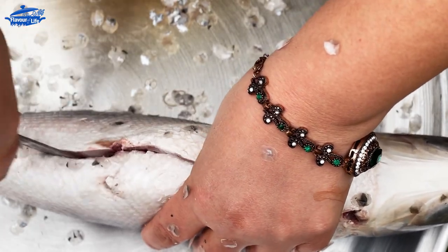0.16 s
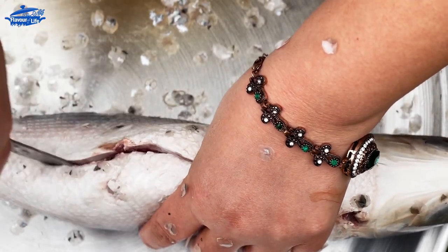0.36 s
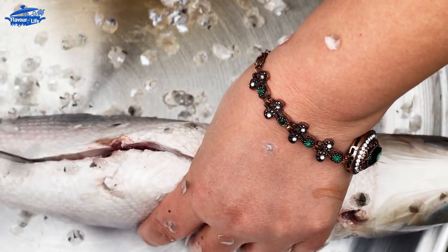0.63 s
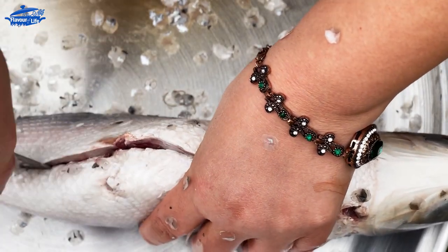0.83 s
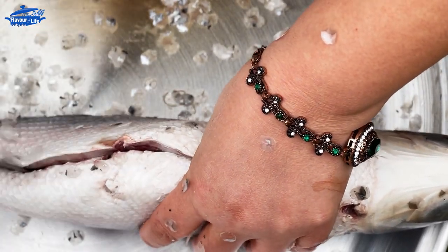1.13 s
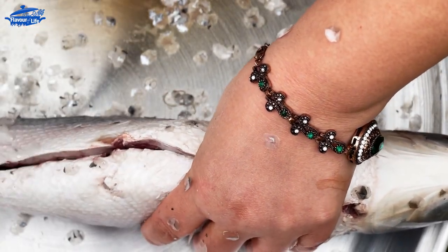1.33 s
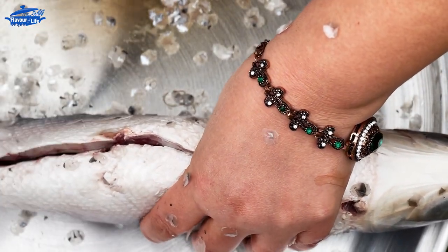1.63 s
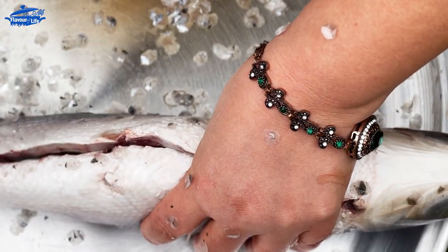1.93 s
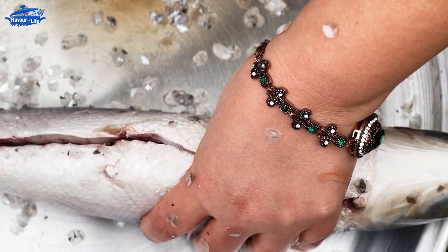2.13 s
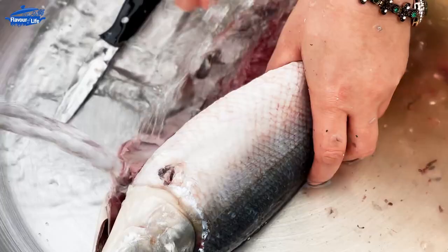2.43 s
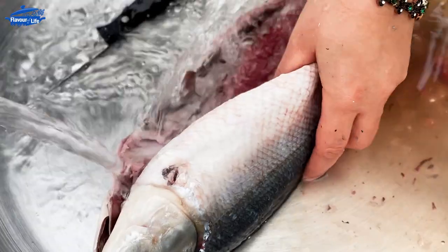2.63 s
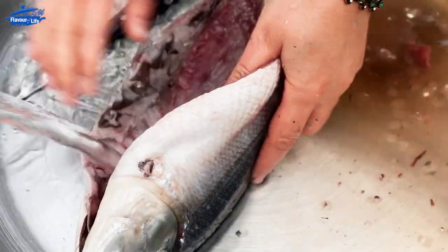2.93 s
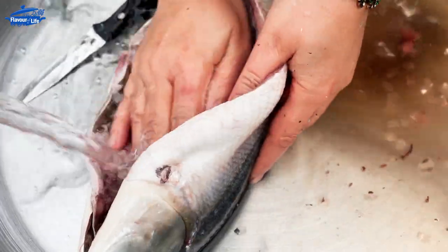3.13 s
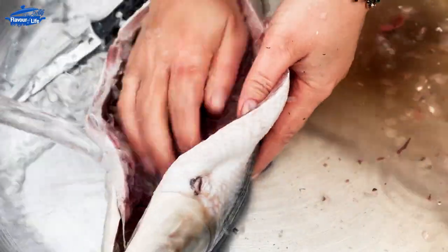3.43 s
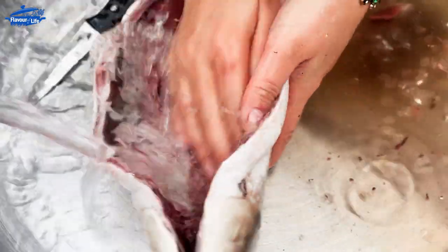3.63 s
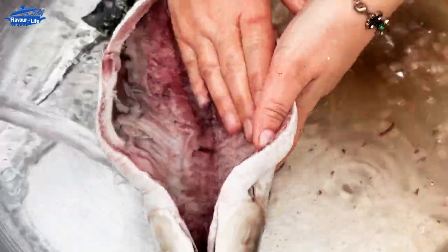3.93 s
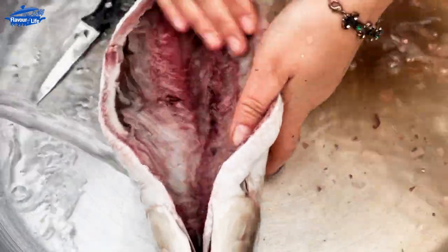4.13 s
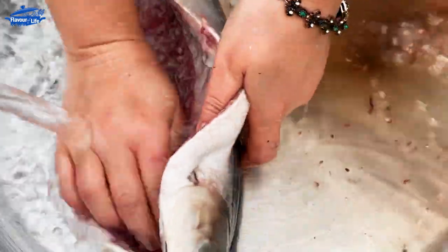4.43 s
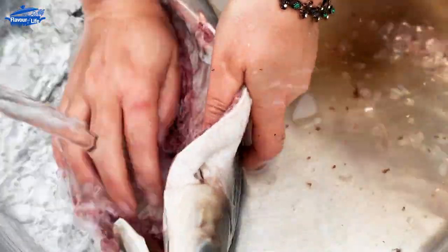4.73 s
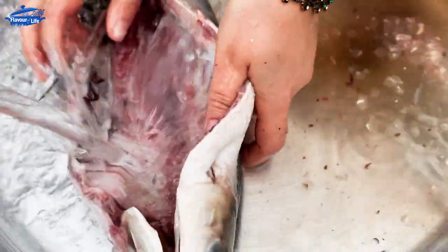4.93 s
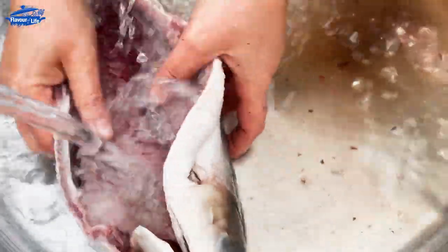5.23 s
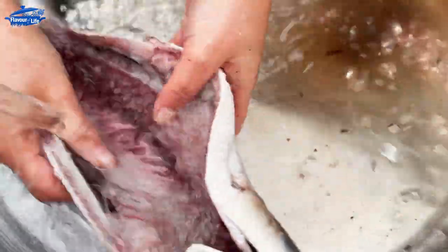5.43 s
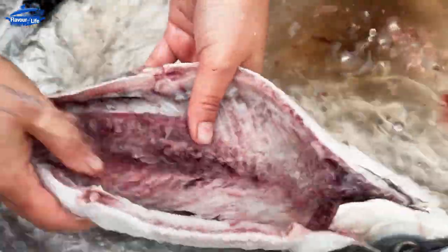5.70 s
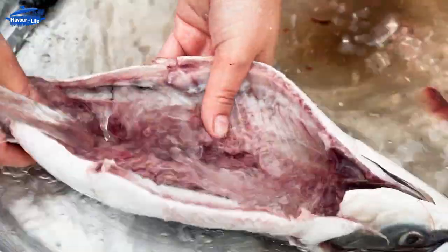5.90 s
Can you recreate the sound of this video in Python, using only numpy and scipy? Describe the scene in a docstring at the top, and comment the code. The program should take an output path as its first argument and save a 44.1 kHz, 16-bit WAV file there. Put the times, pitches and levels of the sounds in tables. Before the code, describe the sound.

Recorded very close, in a quiet kitchen with only a faint dull reverberation and soft air noise. From 0 to 2.4 s a knife slits a fish: low-level wet rubbing in uneven pushes, bunches of fine crackling fibres, and thin squeaks around 2.5-4.5 kHz, some gliding upward. A short crunchy bone snap comes at 1.54 s and a louder one at 1.9 s, each with a small fleshy thud. At about 2.47 s the cutting ends abruptly and a water stream begins, with small rising bubbles, fine spray and droplet clicks. Hand sweeps make it surge, strongly around 3.3, 4.0 and 4.3 s, with round plops and squirts; a prominent plop pops at 4.8 s. From 5.3 s the fish slides, slapping wetly on damped steel at 5.43 s. A strong squelch follows near 5.7 s, with bubbling water to the end at about 6 s.

```python
"""Gutting and rinsing a fish.

A knife slits the belly in a steel basin: torn fibres crackle, gliding tones squeak, two bones snap.
At TAP_ON_S the cutting noise stops and a tap runs: random chirped bubbles and droplet clicks,
stirred by a hand. The fish also slides and, near the end, slaps down: click bursts drive basin modes.
"""
import sys
import numpy as np
from scipy import signal
from scipy.fft import rfft, irfft, next_fast_len
from scipy.io import wavfile

SR = 44100
rng = np.random.default_rng(int(sys.argv[2]) if len(sys.argv) > 2 else 0)


def put_to_file(sound):
    """Save the sound as 16-bit audio at rate SR, in the file named by the first command-line argument."""
    columns = np.atleast_2d(sound).T  # one column per channel
    safe = np.clip(columns, -1, 1)
    whole_steps = np.round(safe * 32767)
    wavfile.write(sys.argv[1], SR, whole_steps.astype(np.int16))


N = 267246
TIME = np.arange(N) / SR
TAP_ON_S = 2.467
# spectrum of spray and wet ticks: f/Hz, level/dB
SPRAY_SPECTRUM = [(300, -20), (700, -9), (1500, 1), (3300, 7), (5000, -2), (7000, -1), (10000, -1),
                  (13500, -4), (16000, -7.5)]


def from_db(db):
    """Decibels to amplitude gain."""
    return 10 ** (np.asarray(db) / 20)


def rms_one(x):
    """Scale to unit rms."""
    return x / np.sqrt(np.mean(x ** 2) + 1e-20)


def add(out, start_s, sound):
    """Mix a short sound into out at start_s."""
    at = int(np.clip(start_s * SR, 0, N - 1))
    out[at:at + len(sound)] += sound[:N - at]


def colour(x, spectrum):
    """Causal minimum-phase filter with the given spectrum, by folded cepstrum; unit rms out."""
    size = 2 * next_fast_len(len(x) // 2 + 2048)
    hz, db = np.transpose(spectrum)
    log_hz = np.log(np.arange(size // 2 + 1) * SR / size + 1)
    log_gain = np.log(from_db(np.interp(log_hz, np.log(hz), db)))
    cepstrum = irfft(log_gain)
    cepstrum[1:size // 2] *= 2
    cepstrum[size // 2 + 1:] = 0
    response = np.exp(rfft(cepstrum))
    return rms_one(irfft(rfft(x, size) * response)[:len(x)])


def cut(x, hz, kind, order=2):
    """Butterworth high- or low-pass."""
    sos = signal.butter(order, min(hz, .45 * SR), kind, fs=SR, output="sos")
    return signal.sosfilt(sos, x)


def ring(force, modes):
    """Damped sine modes (f/Hz, level/dB, t60/s) driven by a force, with alternating signs."""
    out = 0
    for k, (hz, db, t60_s) in enumerate(modes):
        radius = from_db(-60 / (t60_s * SR))
        angle = 2 * np.pi * hz / SR
        poles = [1, -2 * radius * np.cos(angle), radius * radius]
        mode = signal.lfilter([0, np.sin(angle)], poles, force + 1e-18)
        out = out + (-1) ** k * from_db(db) * mode
    return out


def grains(size, per_s, spread_db):
    """Random single-sample clicks of uneven strength and either sign."""
    clicks = np.zeros(size)
    at = np.flatnonzero(rng.random(size) < per_s / SR)
    strength_db = spread_db * np.minimum(rng.exponential(1, len(at)), 4)
    clicks[at] = rng.choice([-1, 1], len(at)) * from_db(strength_db)
    return clicks


def clumps(rate_hz, depth_db):
    """A gain that swells and sinks at random, below rate_hz and within +-depth_db."""
    drift = rms_one(cut(rng.standard_normal(N), rate_hz, "low"))
    return from_db(depth_db * np.tanh(drift))


def swell(peak_s, db, attack_s, release_s, hold_s=0):
    """Power of one gesture: rises to its level, holds, sinks; attack and release span 20 dB."""
    before = np.maximum(peak_s - TIME, 0) / attack_s
    after = np.maximum(TIME - peak_s - hold_s, 0) / release_s
    return from_db(db - 20 * np.minimum(before + after, 10)) ** 2


def bubble(hz, cycles, rise):
    """A bubble swells within a cycle or two, then rings down, its pitch rising as it nears the surface."""
    # age runs 0..1 while the ring falls 60 dB
    age = np.arange(int(cycles / hz * SR) + 2) * hz / SR / cycles
    onset = 1 - np.exp(-(age * cycles) ** 2)
    tone = np.sin(2 * np.pi * cycles * age * (1 + rise * age / 2))
    return tone * from_db(-60 * age) * onset


def slitting():
    """The blade rubs along wet flesh while fine fibres part in bunches: two streams of clicks."""
    # blade pushes: hardest at t/s, rubbing level/dB, build/s, release/s (per 20 dB)
    push_table = [(0.03, -65.5, 0.055, .3), (.19, -72, .1, 0.41), (0.422, -64, .07, 0.11),
                  (1.15, -65.5, 0.12, 0.31), (1.52, -57.5, 0.19, 0.061), (1.661, -65, 0.18, 0.22),
                  (1.89, -59.5, 0.067, 0.032), (1.99, -64.5, .12, 0.39), (2.44, -69.5, 0.57, .1)]
    # bunches of tearing fibres: start t/s, length/s, crackle level/dB before high-pass
    tear_table = [(0.01, 0.047, -66.5), (0.185, 0.048, -65.5), (0.365, 0.036, -68), (0.414, 0.017, -55),
                  (0.547, 0.097, -68), (.73, 0.056, -72), (.8, 0.043, -63), (.975, 0.041, -69),
                  (1.108, .09, -64), (1.293, 0.084, -62.5), (1.39, 0.16, -70), (1.665, 0.11, -71.5),
                  (1.838, .05, -67.5), (1.981, 0.079, -69), (2.267, 0.044, -69.5), (2.34, 0.11, -69)]
    # click spectra: f/Hz, level/dB
    rub_spectrum = [(150, -13.5), (320, -1), (700, -10.5), (1400, -1), (2100, -4.5), (2700, 3.5),
                    (3800, -1), (5500, -13), (9000, -32.5)]
    crackle_spectrum = [(1500, -12.5), (3500, 3), (6000, 1), (9000, 3), (13000, 0), (16000, -1.5)]
    resting_blade_db, stray_fibres_db = -91, -79
    tear_attack_s, tear_release_s = 0.018, 0.019

    pushing = from_db(resting_blade_db) ** 2
    pushing = pushing + sum(swell(*push) for push in push_table)
    tearing = from_db(stray_fibres_db) ** 2
    for start_s, length_s, db in tear_table:
        tearing = tearing + swell(start_s, db, tear_attack_s, tear_release_s, length_s)
    rub = np.sqrt(pushing) * colour(grains(N, 12000, 2.3), rub_spectrum)
    fibres = grains(N, 2400, 3.7) * clumps(45, 7.7)
    crackle = np.sqrt(tearing) * colour(fibres, crackle_spectrum)
    return (rub + cut(crackle, 1500, "high")) * (TIME < TAP_ON_S)


def squeaks(flutter_hz=90, waver=.005, fray_hz=300, fray_db=-10, gain_db=-1):
    """The sliding blade squeaks: narrow tones that swell and glide, frayed by the uneven grip."""
    # start t/s, end t/s, start f/Hz, end f/Hz, rms level/dB before gain_db
    squeak_table = [(0.111, 0.185, 3050, 2590, -76), (.23, 0.326, 2700, 2710, -70),
                    (0.629, 0.762, 2580, 2720, -68), (.7, 1.005, 3480, 3500, -79),
                    (0.754, 0.996, 2730, 2700, -82), (0.67, 0.688, 1519, 1530, -72),
                    (0.86, 1.052, 3870, 3820, -83), (0.856, 1.11, 3020, 3050, -75),
                    (0.986, 1.142, 2670, 2610, -68.5), (1.366, 1.539, 2450, 2730, -68),
                    (1.627, 1.89, 2850, 4590, -71.5), (1.655, 1.716, 3150, 2720, -66),
                    (1.711, 1.852, 2360, 2410, -71), (1.788, 1.894, 780, 770, -71.5),
                    (2.042, 2.154, 2620, 2686, -68), (2.046, 2.174, 2930, 3260, -73),
                    (2.202, 2.45, 3070, 4490, -73)]
    out = np.zeros(N)
    for start_s, end_s, from_hz, to_hz, db in squeak_table:
        size = max(int((end_s - start_s) * SR), 256)
        pitch_drift = rms_one(cut(rng.standard_normal(size), flutter_hz, "low"))
        grip = rms_one(cut(rng.standard_normal(size), flutter_hz, "low"))
        fray = from_db(fray_db) * rms_one(cut(rng.standard_normal(size), fray_hz, "low"))
        hz = np.linspace(from_hz, to_hz, size) * (1 + waver * pitch_drift)
        tone = np.sin(2 * np.pi * np.cumsum(hz) / SR) * (1 + 0.34 * grip + fray)
        tone = rms_one(tone * signal.windows.tukey(size, .5))
        add(out, start_s, from_db(db + gain_db) * tone)
    return out


def snaps(tail_t60_s=0.019, bone_t60_s=0.01265, bone_db=-1, push_hz=900, boom_hz=130, boom_db=-28):
    """A bone splinters ever harder for a few milliseconds, then gives way and jolts the body."""
    # t/s, crunch peak/dB, crunch length/s (full at half of it), bone f/Hz,
    # thud peak/dB (without boom), thud delay/s, body pitch factor
    snap_table = [(1.5375, -16, 0.00724, 2800, -17, 0.00295, 1.01),
                  (1.8991, -8.5, 0.0073, 3300, -10.5, .0045, 1.128)]
    # splinter spectrum: f/Hz, level/dB
    snap_spectrum = [(50, -38), (200, -22), (350, -6), (700, -4.5), (1050, -10), (1400, 1), (2000, -7),
                     (3000, -0.5), (4200, 3.5), (4900, 2), (6200, -13), (7200, -3), (8500, -11.5),
                     (11000, -9), (16000, -22)]
    # body modes of the fish: f/Hz before pitch factor, level/dB, t60/s
    flesh_modes = [(372, 0.5, 0.024), (530, -1, .013), (780, -5, .014), (1206, -7, 0.015)]
    out, t = np.zeros(N), TIME[:SR // 10]
    for snap_s, crunch_db, length_s, bone_hz, thud_db, delay_s, pitch in snap_table:
        build = np.minimum(t / length_s * 2, 1) ** 2
        decay = from_db(-60 * np.maximum(t - length_s / 2, 0) / tail_t60_s)
        splinters = colour(grains(len(t), 20000, 0.9) * build * decay, snap_spectrum)
        bone = rms_one(ring(splinters, [(bone_hz, 0, bone_t60_s)]))
        crunch = splinters + from_db(bone_db) * bone
        add(out, snap_s, from_db(crunch_db) * crunch / np.abs(crunch).max())

        release = cut(1. * (t == 0), push_hz, "low", order=1)
        thud = cut(ring(release, np.multiply(flesh_modes, [pitch, 1, 1])), 300, "high")
        boom = cut(release, boom_hz, "low")   # the whole fish is jolted
        jolt = thud / np.abs(thud).max() + from_db(boom_db) * boom / boom.max()
        add(out, snap_s + delay_s, from_db(thud_db) * jolt)
    return out


def ticks(t60_s=0.017, ring_t60_s=.01, ring_db=-3, low_hz=900, gain_db=1):
    """Flesh, fingers and drops tick: one sharp rupture, a quick run of smaller ones, a short ring."""
    # t/s, peak level/dB before gain_db, ring f/Hz
    tick_table = [(0.0417, -44, 3700), (0.1837, -46.5, 2834), (0.417, -43.5, 3620), (0.5207, -51, 2700),
                  (0.73, -55, 3520), (1.0727, -50.5, 2700), (1.1369, -43.5, 1250), (1.6077, -43.5, 2870),
                  (1.6765, -38.5, 7090), (2.1245, -48, 3080), (3.1972, -29.5, 3540), (3.3405, -28, 3150),
                  (3.755, -28.5, 3000), (3.765, -31, 2700), (4.2655, -27.5, 1510), (4.384, -28, 3640),
                  (4.78, -33, 5170), (5.3936, -24, 3180), (5.5396, -26.5, 3700), (5.598, -33, 3020),
                  (5.7134, -28, 2900)]
    out, t = np.zeros(N), TIME[:SR // 20]
    for start_s, db, hz in tick_table:
        force = grains(len(t), 9000, 1.5) * from_db(-60 * t / t60_s) + 2.3 * (t == 0)
        ringing = rms_one(ring(force, [(hz, 0, ring_t60_s)]))
        tick = colour(force, SPRAY_SPECTRUM) + from_db(ring_db) * ringing
        tick = cut(tick, low_hz, "high", order=3)
        add(out, start_s, from_db(db + gain_db) * tick / np.abs(tick).max())
    return out


def churning():
    """Power-sums stream, hand sweeps and squelches: bubbling/dB, spray/dB, lowest bubble f/Hz."""
    # hand sweeps trap air: middle t/s, 1/e power width/s, bubbling/dB, spray/dB, lowest f/Hz
    sweep_table = [(2.592, 0.38, -52, -58.5, 1130), (2.835, 0.077, -52.5, -54, 1100),
                   (3.078, 0.23, -53.5, -62, 1397), (3.35, .12, -52.5, -52.5, 910),
                   (3.48, 0.16, -53.5, -58.5, 930), (3.963, .38, -50.5, -53.5, 1000),
                   (4.27, .13, -46.5, -49.5, 1000), (4.498, 0.13, -58.5, -55, 850),
                   (4.843, 0.25, -53.5, -57, 1190), (5.1, 0.28, -54.5, -56, 1560),
                   (5.37, 0.23, -49, -48.5, 950), (5.662, .2, -50.5, -51, 1200),
                   (5.922, .2, -53, -59, 1830)]
    # water squirts from under the fingers: t/s, bubbling/dB, spray/dB
    squelch_table = [(3.195, -52, -52), (3.608, -44.5, -51), (3.765, -51.5, -41), (4.386, -47, -43.5),
                     (4.794, -47, -40), (5.716, -37.5, -38.5), (5.848, -43, -69)]
    squelch_attack_s, squelch_release_s, squelch_lowest_hz = 0.024, 0.047, 1000

    # power shape, bubbling/dB, spray/dB, lowest f/Hz; the steady stream comes first
    gestures = [(np.ones(N), -59.5, -57.5, 1250)]
    for middle_s, width_s, *settings in sweep_table:
        gestures.append((np.exp(-(2 * (TIME - middle_s) / width_s) ** 2), *settings))
    for peak_s, *levels_db in squelch_table:
        shape = swell(peak_s, 0, squelch_attack_s, squelch_release_s)
        gestures.append((shape, *levels_db, squelch_lowest_hz))

    bubbling = spray = weighted_hz = 0
    for shape, bubbling_db, spray_db, hz in gestures:
        power = shape * from_db(bubbling_db) ** 2
        bubbling = bubbling + power
        weighted_hz = weighted_hz + power * hz   # the strongest gesture dominates bubble size
        spray = spray + shape * from_db(spray_db) ** 2
    return 10 * np.log10(bubbling), 10 * np.log10(spray), weighted_hz / bubbling


def fizz(count=20, cycles=30, click_db=-4):
    """Droplets tick on the wet surfaces, and the tiniest bubbles ping for an instant."""
    pings = 0
    for hz in np.geomspace(4000, 15500, count):
        pings = pings + ring(grains(N, 120, 4.14), [(hz, 0, cycles / hz)])
    return rms_one(pings) + from_db(click_db) * rms_one(grains(N, 8000, 3.2))


def rinsing(count=7500, top_hz=6000, cycles=24, rise=0.21, size_spread_db=4.0):
    """The stream beats air into swarms of small bubbles and throws a fine spray."""
    # swarm spectrum: f/Hz, level/dB
    water_spectrum = [(500, -36), (720, -34.5), (900, 1), (1600, -2), (2200, 1), (3200, 5), (4200, -9.5),
                      (7000, -11.5), (12000, -48)]
    gurgle_hz, gurgle_db = 16.6, 2   # bubbles come in bunches
    bubbling_db, spray_db, lowest_hz = churning()
    swarm = np.zeros(N)
    for when, smallness, strength, damping, side in rng.random((count, 5)):
        start_s = TAP_ON_S + when * (TIME[-1] - TAP_ON_S)
        low_hz = lowest_hz[int(start_s * SR)]
        hz = low_hz * (top_hz / low_hz) ** smallness
        strength_db = size_spread_db * min(-np.log(1 - strength), 4)
        gain = from_db(strength_db) * np.sqrt(hz / top_hz) * np.sign(side - .5)
        add(swarm, start_s, gain * bubble(hz, cycles * (.5 + damping), rise))
    swarm = from_db(bubbling_db) * colour(swarm * clumps(gurgle_hz, gurgle_db), water_spectrum)
    spray = from_db(spray_db) * colour(fizz() * clumps(34, 2.58), SPRAY_SPECTRUM)
    return (swarm + cut(spray, 780, "high", order=1)) * (TIME >= TAP_ON_S)


def plops(cycles=30, rise=.5, pitch=0.938, gain_db=1.0, low_hz=780):
    """Large air pockets squeezed out under the hand ring as single bubbles."""
    # t/s, level/dB before gain_db and high-pass, f/Hz before the pitch factor
    plop_table = [(3.33, -33.5, 967), (3.482, -36.5, 1030), (3.609, -33.5, 1630), (3.919, -32, 1110),
                  (3.984, -30.5, 1670), (4.044, -37.5, 1090), (4.095, -31, 1473), (4.226, -35.5, 1050),
                  (4.266, -26.5, 1584), (4.306, -28.5, 2125), (4.354, -31.5, 2250), (4.361, -34.5, 1060),
                  (4.792, -22, 1740), (4.855, -28.5, 1356), (5.065, -30.5, 1900), (5.152, -35.5, 1192),
                  (5.195, -30.5, 2280), (5.726, -30.5, 1057), (5.841, -30.5, 1070)]
    out = np.zeros(N)
    for start_s, db, hz in plop_table:
        add(out, start_s, from_db(db + gain_db) * bubble(hz * pitch, cycles, rise))
    return cut(out, low_hz, "high", order=5)


def fish_on_basin(steel_db=-3, wet_db=-2):
    """Wet skin meets the steel patch by patch; the blows and the sliding drive the basin's modes."""
    # landings: t/s, force level/dB, contact/s, decay t60/s, low-pass f/Hz
    slap_table = [(5.309, -33, 0.011, 0.03, 800), (5.434, -15, 0.014, 0.069, 6700),
                  (5.597, -41.5, 0.0071, 0.086, 2060), (5.708, -45, 0.017, 0.041, 6040),
                  (5.84, -44, 0.021, 0.07, 1200)]
    # shoves over the steel: fastest at t/s, force level/dB, stopping time/s (per 20 dB)
    shove_table = [(2.83, -59.5, 0.072), (4.28, -60, 0.06), (4.52, -66, 0.1), (5.33, -48.5, 0.24),
                   (5.62, -52.5, 0.2), (5.85, -49, 0.063)]
    # wet steel basin damped by the fish: f/Hz, level/dB, t60/s
    basin_modes = [(424, -12, 0.029), (607, -3.5, 0.035), (697, 1, 0.035), (734, 5, 0.041),
                   (1022, -13.5, 0.065), (1245, -1.5, 0.076), (1420, -4.5, 0.053), (1610, -4.5, 0.09),
                   (1740, -3, .045), (2080, -12, .04), (2407, 4.5, 0.039), (2620, -8.5, 0.052),
                   (2700, 9, 0.029), (2950, 0.5, 0.048), (3090, 9.5, 0.023), (3240, 6, 0.036),
                   (3564, -14, 0.04), (4170, -14, 0.05)]
    # smack spectrum: f/Hz, level/dB
    slap_spectrum = [(60, -37), (150, -31), (290, -30), (390, -7), (540, -6), (740, 5.5), (1000, -2),
                     (2600, -3.5), (3300, -6), (4200, -7), (7000, -15.5), (12500, -17.5), (16000, -21)]
    shove_start_s, stream_on_steel_db = 0.056, -83

    force, t = np.zeros(N), TIME[:SR // 4]
    for start_s, db, contact_s, t60_s, dull_hz in slap_table:
        patches = rms_one(cut(grains(len(t), 14000, 2.75), dull_hz, "low", order=1))
        decay = from_db(-60 * np.maximum(t - contact_s, 0) / t60_s)
        add(force, start_s, from_db(db) * patches * decay)

    # the falling water drums faintly on the basin
    sliding = from_db(stream_on_steel_db) ** 2 * (TIME >= TAP_ON_S)
    sliding = sliding + sum(swell(s, db, shove_start_s, stop_s) for s, db, stop_s in shove_table)
    force += np.sqrt(sliding) * rms_one(cut(grains(N, 3000, 1.5), 1230, "low"))

    # the sheet radiates little below its lowest mode
    steel = rms_one(cut(ring(force, basin_modes), 385, "high", order=5))
    smack = colour(force, slap_spectrum)
    return np.std(force) * (from_db(steel_db) * steel + from_db(wet_db) * smack)


def kitchen(x, t60_s=0.22, wet_db=-42, dull_hz=2000):
    """Adds a faint, dull tail from distant walls: convolution with decaying noise."""
    t = TIME[:SR // 3]
    noise = cut(rng.standard_normal(len(t)), dull_hz, "low")
    tail = cut(noise, 1000, "high") * from_db(-60 * t / t60_s)
    return x + from_db(wet_db) * signal.fftconvolve(x, tail / np.linalg.norm(tail))[:N]


def still_air(level_db=-75):
    """Still air: steady coloured noise at a fixed rms level."""
    # f/Hz, level/dB
    air_spectrum = [(20, -3), (60, -2), (150, -4), (400, -8.5), (800, -13), (2000, -22.5), (3200, -14),
                    (5000, -21), (16000, -24)]
    return from_db(level_db) * colour(rng.standard_normal(N), air_spectrum)


def scene():
    """All sources close to one microphone, over still air."""
    cutting = slitting() + squeaks() + snaps()
    washing = rinsing() + plops() + fish_on_basin()
    return (kitchen(cutting + ticks() + washing) + still_air())[None]


def record(dry, cutoff_hz=16100, offset=-.0009):
    """Cuts the top steeply; the signal rests slightly below zero."""
    low_pass = signal.ellip(10, .2, 80, cutoff_hz, fs=SR, output="sos")
    return signal.sosfilt(low_pass, dry) + offset


dry = scene()
out = record(dry)
put_to_file(out)
```